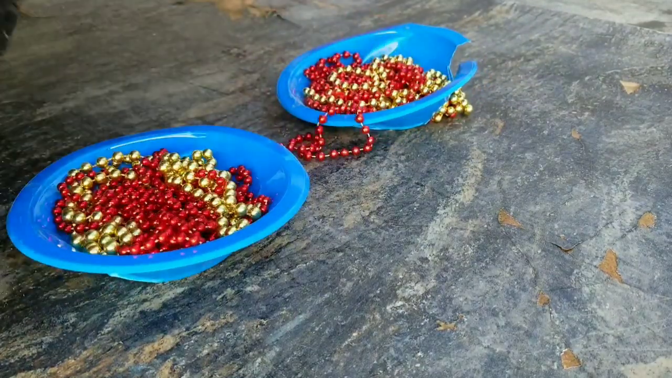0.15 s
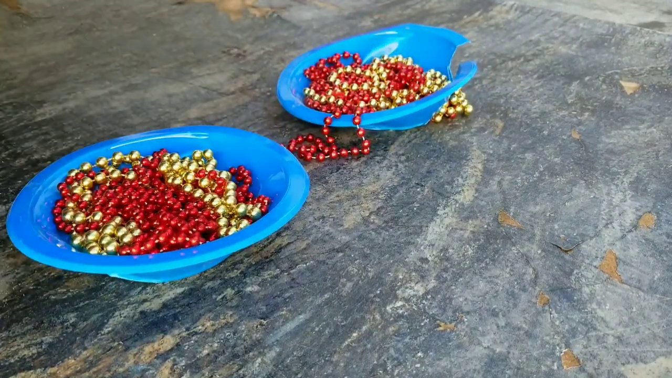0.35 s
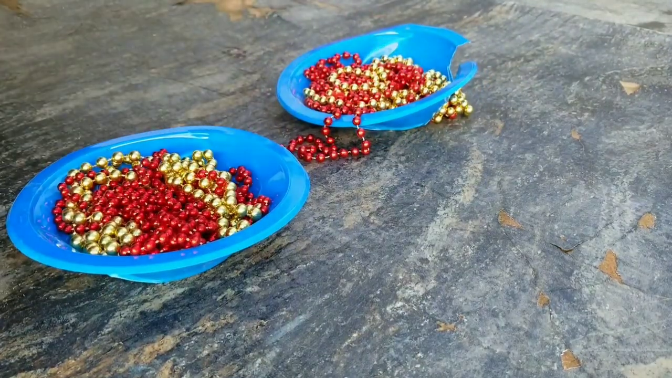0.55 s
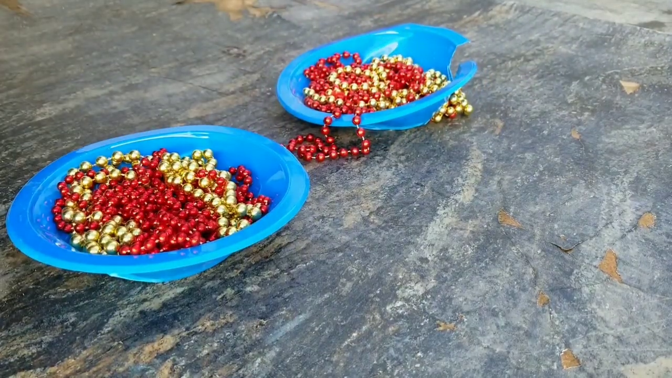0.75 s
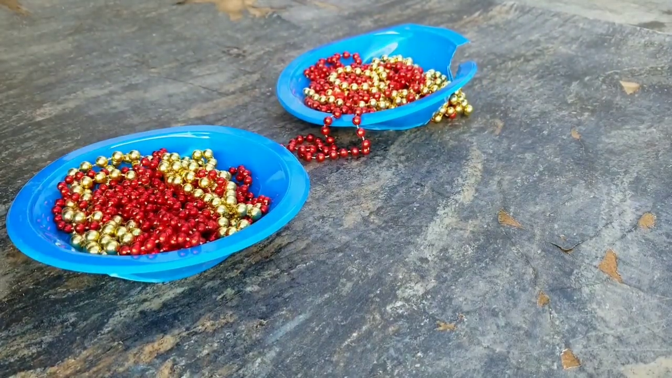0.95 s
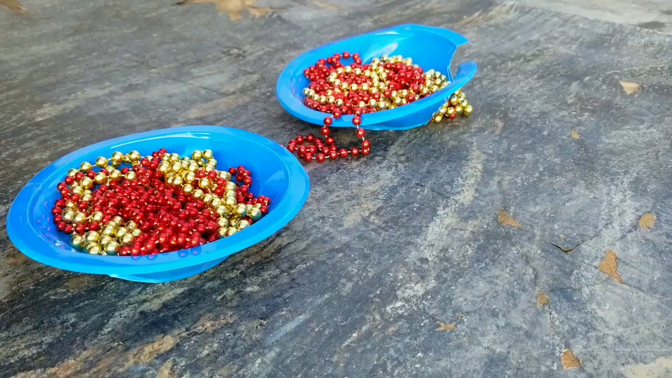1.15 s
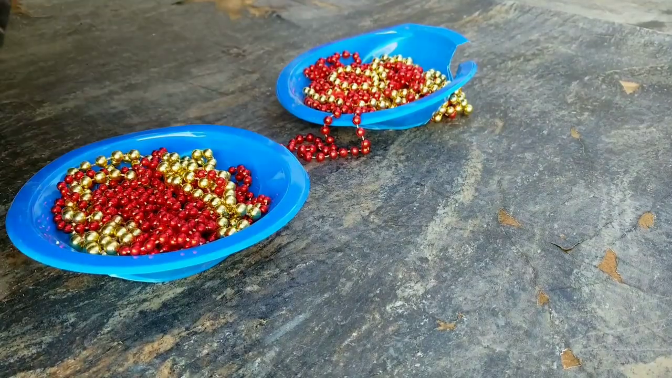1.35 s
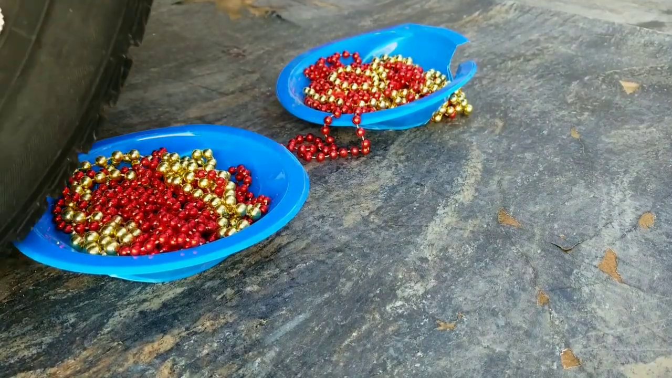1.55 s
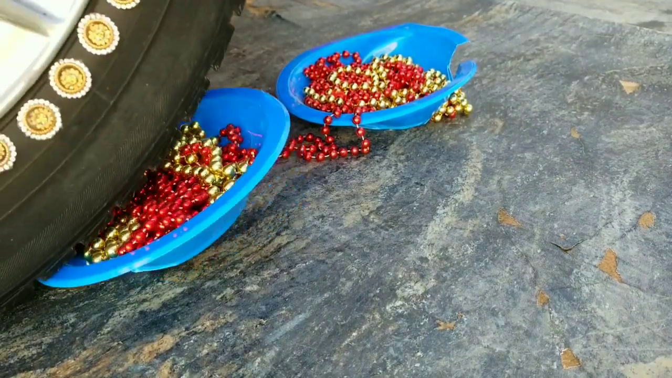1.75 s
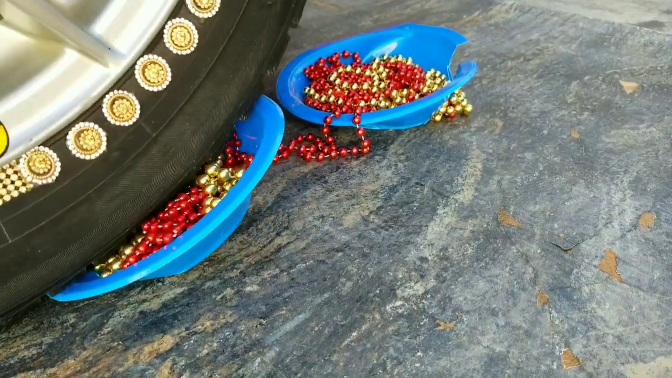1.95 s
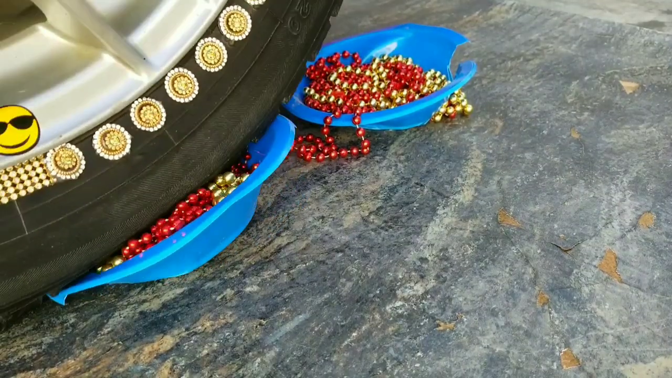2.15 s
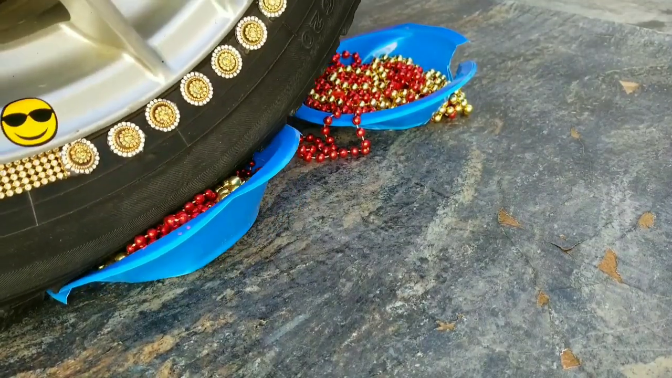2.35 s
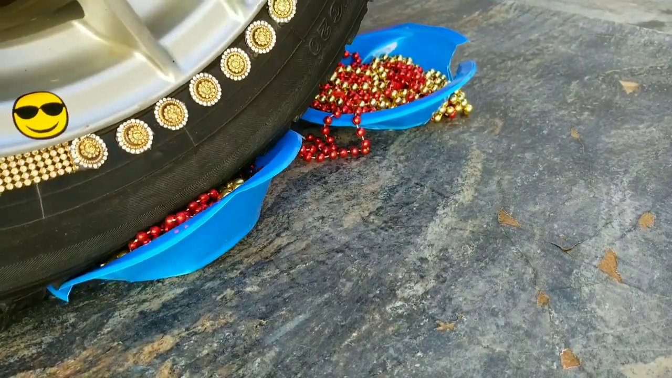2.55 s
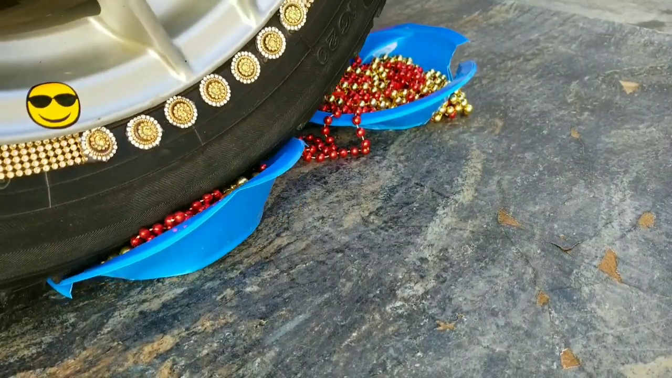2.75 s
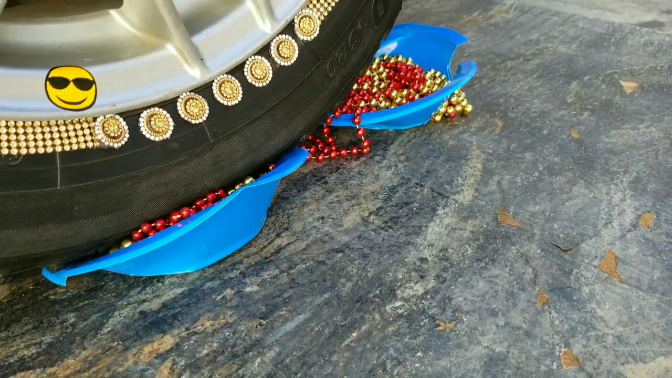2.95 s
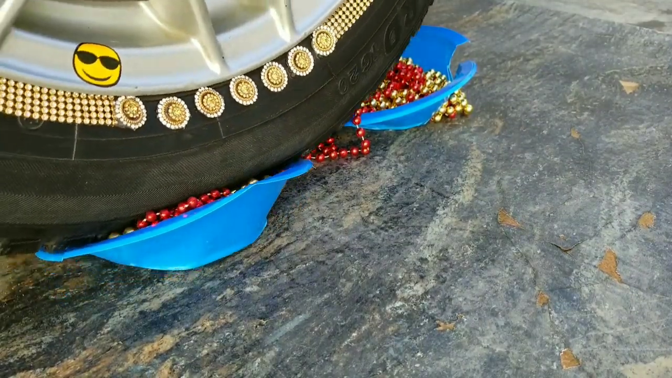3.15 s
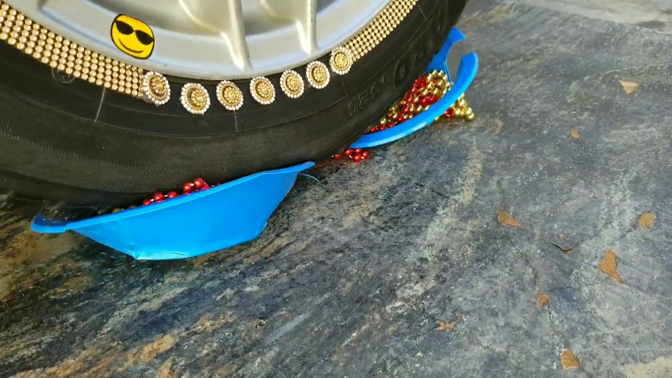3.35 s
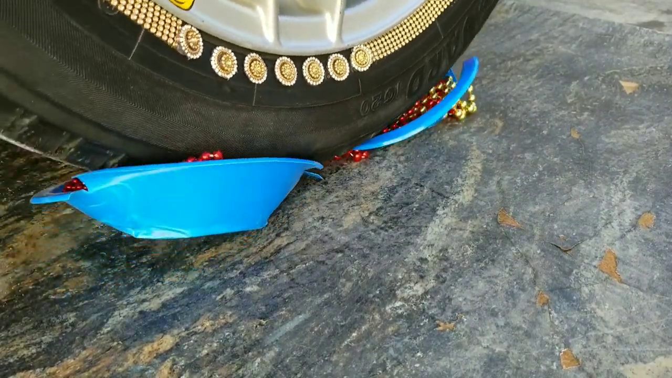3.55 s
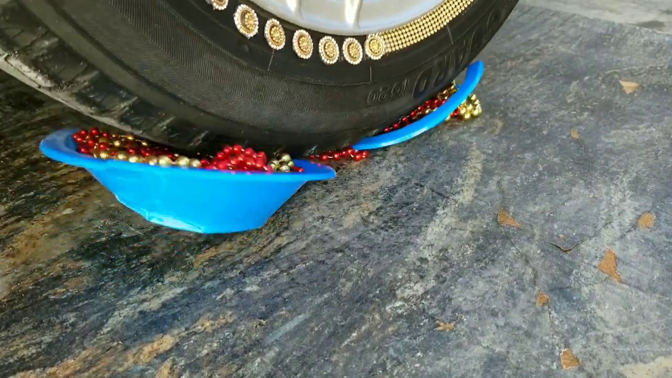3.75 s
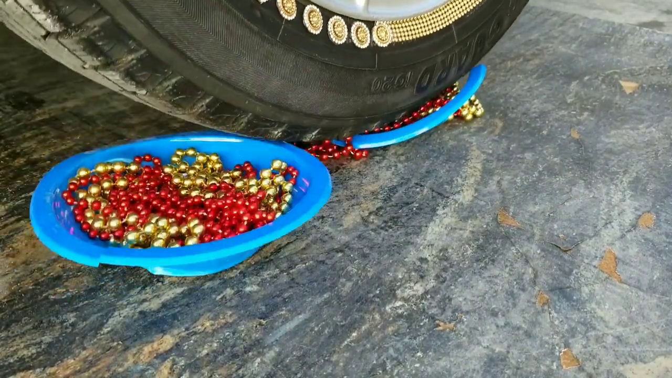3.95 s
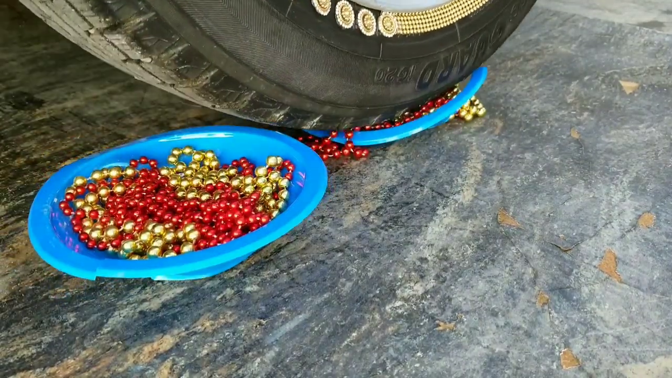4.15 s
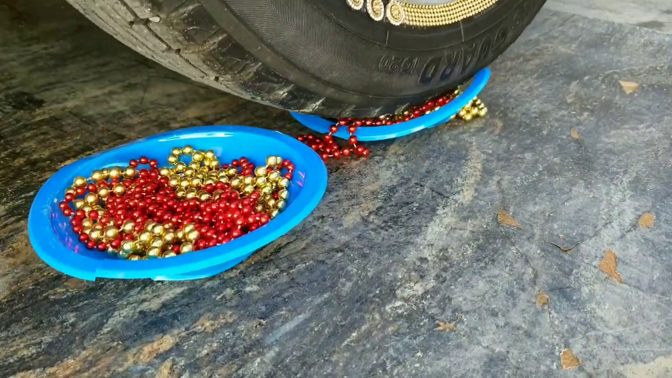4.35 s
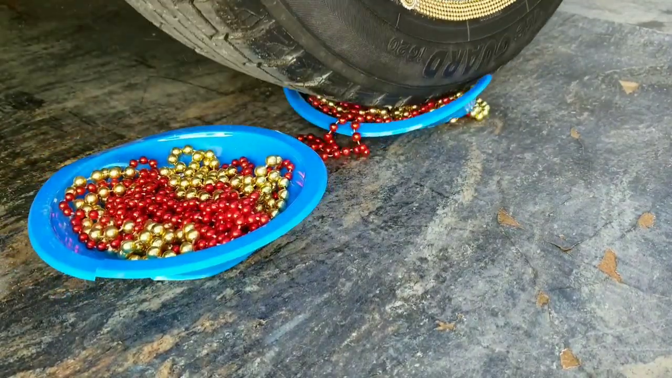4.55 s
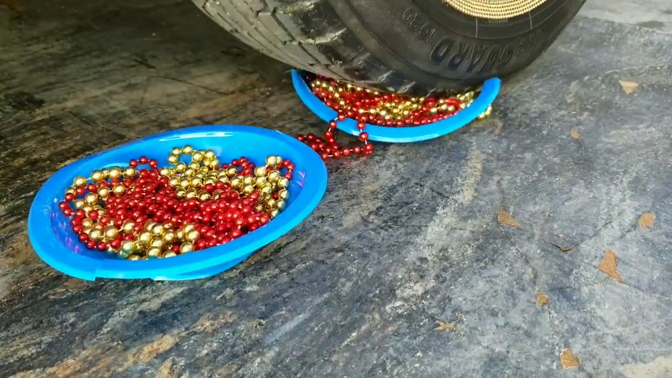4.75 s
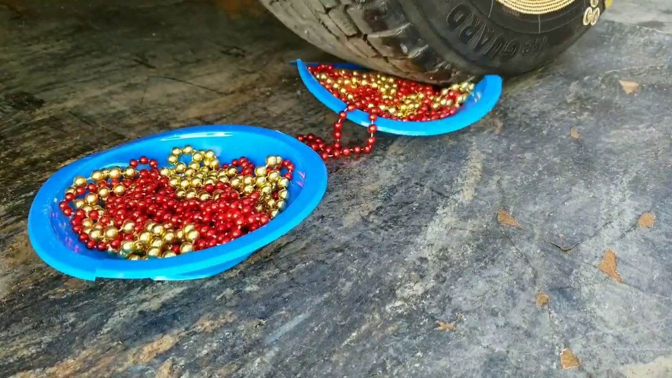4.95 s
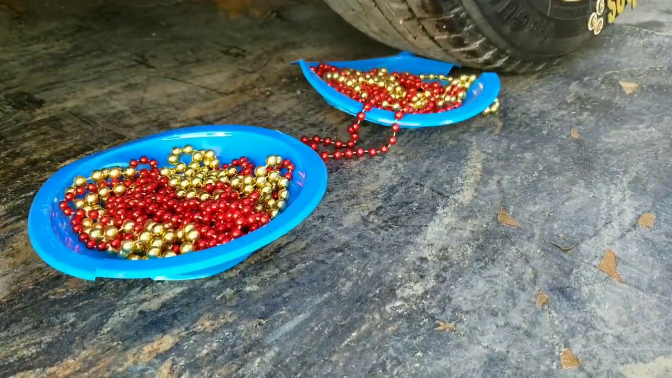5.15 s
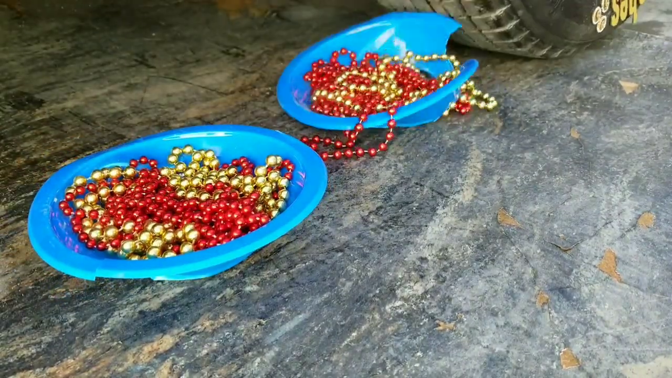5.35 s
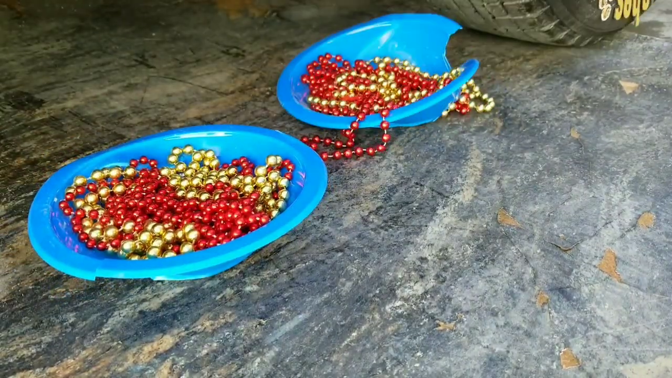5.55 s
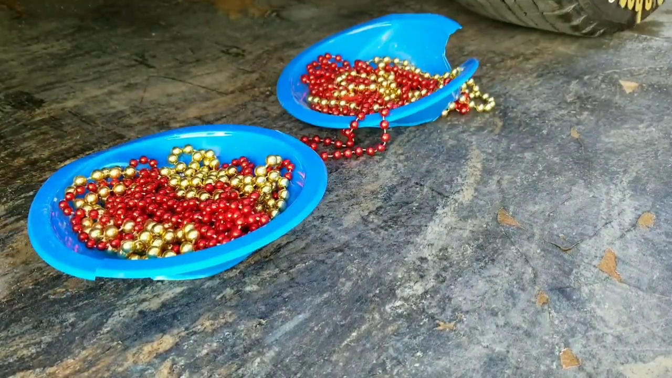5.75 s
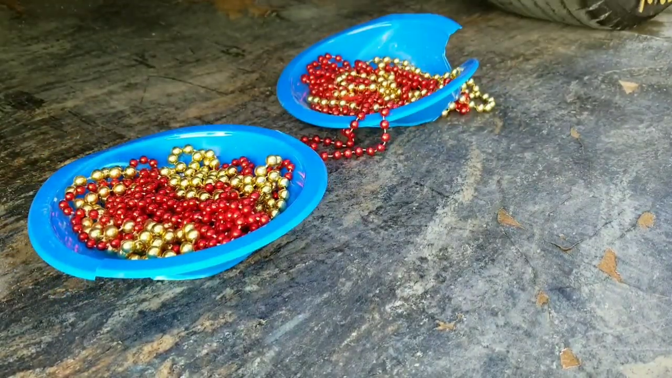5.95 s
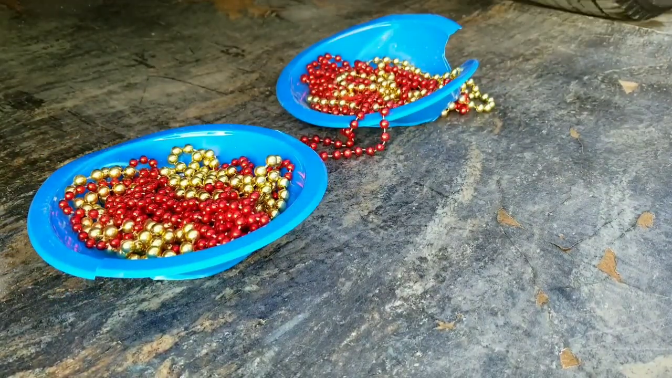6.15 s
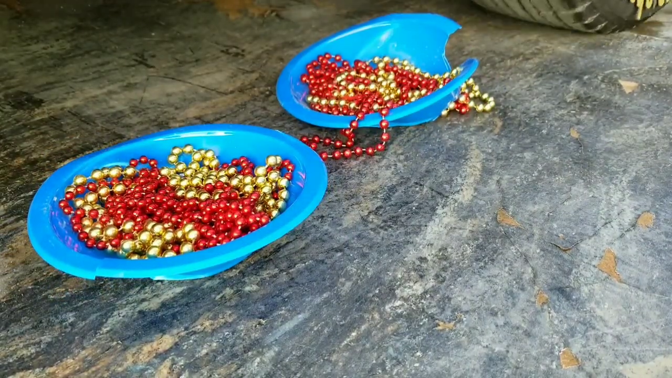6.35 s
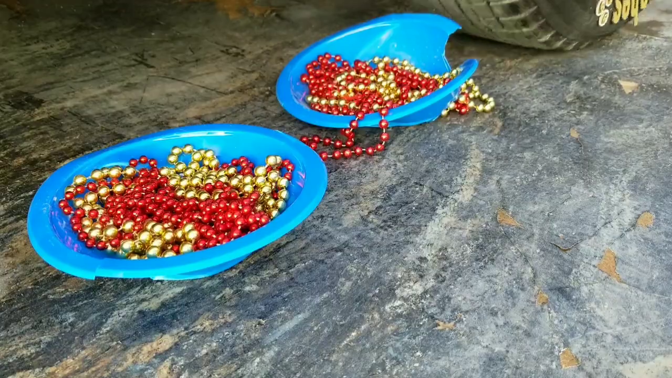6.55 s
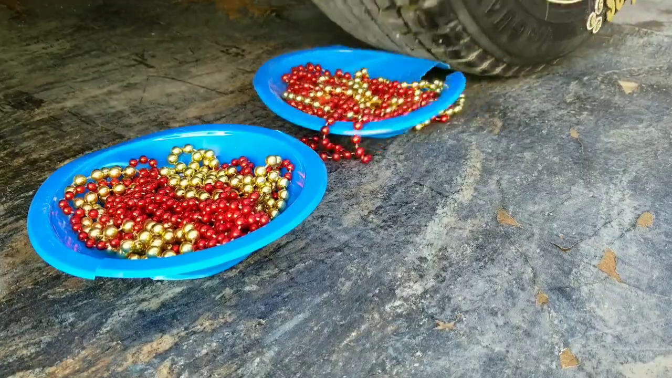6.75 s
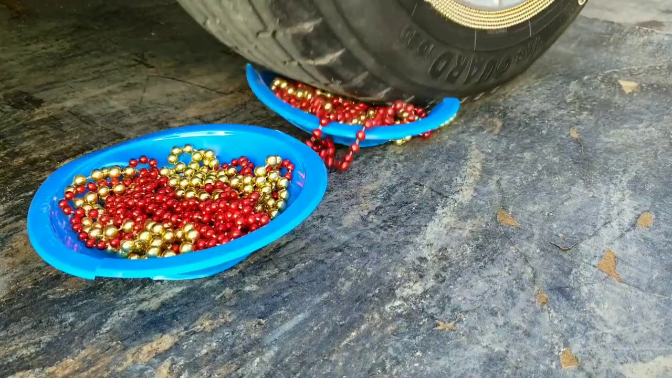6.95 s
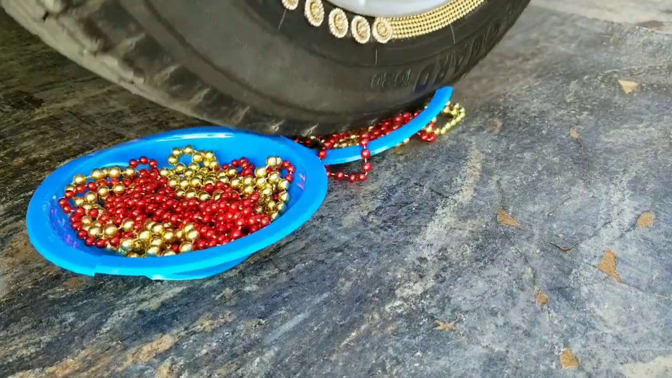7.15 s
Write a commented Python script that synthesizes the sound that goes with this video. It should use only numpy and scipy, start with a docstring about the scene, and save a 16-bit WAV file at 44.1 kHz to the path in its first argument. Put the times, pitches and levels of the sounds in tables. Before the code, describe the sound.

Close stereo pickup on a hard floor with short, diffuse echo. Beads clatter down and settle into near quiet. A tyre creeps up with a faint low groan; beads slide and crunch, then the near bowl, slightly left, snaps and pops in a dense burst. Cracks thin out, then return as the tyre moves to the farther, more central bowl. A quiet lull with bead ticks follows, then creaks and renewed cracking.

```python
"""Sharp plastic cracks, each a bright snap and a hollow pop, over beads that slide, crunch and tick.
A car tyre creeps over two thin bowls of bead necklaces on a hard floor, backs off and comes again.
Cracks are noise bursts over decaying shell tones; beads are coloured noise broken into tiny contacts.
The tyre is a soft noise rumble whose air rings with one low note; a diffuse noise tail is the short echo.
Shrill creaks, faint squeaks and groans, two faint tones, low and very high, and smooth hiss fill in the rest."""
import sys
import numpy as np
from scipy import signal
from scipy.fft import rfft, irfft, next_fast_len
from scipy.io import wavfile
from scipy.ndimage import uniform_filter1d, map_coordinates

SR = 44100
rng = np.random.default_rng(int(sys.argv[2]) if len(sys.argv) > 2 else 0)


def wav_out(sig):
    """Save sig, one row per channel (or a flat mono array), as 16-bit PCM at SR to the path in sys.argv[1]."""
    wavfile.write(sys.argv[1], SR, np.round(np.clip(np.atleast_2d(sig).T, -1, 1) * 32767).astype(np.int16))


N = 321477

# All dB levels in the tables are relative; the layers trim them further.
# Cracks of the plastic. Each row: time in seconds, snap level in dB, pop level in dB, pop pitch in Hz.
CRACK_EVENTS = [(1.9038, -23.5, -39.5, 1130), (1.925, -18, -28, 1280), (1.9554, -17.5, -31.5, 1230),
                (1.966, -17.5, -46, 1243), (1.9845, -20, -36.5, 1080), (1.9985, -17.5, -25, 1000),
                (2.0083, -23.5, -33.5, 600), (2.0252, -16, -26, 970), (2.0371, -15.5, -26, 915),
                (2.053, -25.5, -21, 826), (2.068, -14.5, -23, 820), (2.0918, -29.5, -31, 900),
                (2.139, -23.5, -36.5, 724), (2.1456, -14, -13.5, 810), (2.1497, -18.5, -18, 850),
                (2.1631, -17, -15.5, 768), (2.1871, -24, -35.5, 790), (2.2069, -10.5, -26.5, 1280),
                (2.2454, -19.5, -13, 836), (2.281, -30.5, -36, 725), (2.3367, -28, -36, 930),
                (2.3559, -24, -33, 880), (2.369, -39, -45.5, 906), (2.388, -26, -27.5, 860),
                (2.44, -16, -17, 792), (2.573, -29, -33.5, 890), (2.6056, -36, -44.5, 962),
                (2.618, -28, -32, 765), (2.634, -30, -34.5, 820), (2.6798, -35, -32.5, 850),
                (2.756, -18, -8.5, 780), (2.784, -16.5, -34, 794), (2.8536, -26, -36.5, 730),
                (2.9035, -27, -30, 700), (2.9552, -29.5, -36.5, 950), (2.9827, -30, -34.5, 1020),
                (3.041, -25, -24.5, 766), (3.0592, -35.5, -30, 740), (3.11, -39, -54.5, 910),
                (3.1286, -39.5, -44.5, 900), (3.1355, -29.5, -31, 805), (3.163, -33, -33.5, 1018),
                (3.1876, -19, -15, 870), (3.2544, -35.5, -50.5, 810), (3.275, -32.5, -36, 1000),
                (3.3189, -21.5, -18, 784), (3.331, -29, -34.5, 825), (3.3852, -20.5, -10, 733),
                (3.402, -24, -42, 857), (3.417, -34, -29, 870), (3.4469, -26.5, -40, 900),
                (3.4688, -28, -30.5, 850), (3.479, -25.5, -32.5, 1090), (3.5165, -16, -21.5, 810),
                (3.5404, -17, -24, 910), (3.5495, -29, -25.5, 865), (3.5786, -21, -26.5, 780),
                (3.6262, -14, -16.5, 770), (3.639, -28, -34.5, 860), (3.6822, -29, -39, 850),
                (3.7247, -21, -36, 1220), (3.758, -33.5, -57, 1370), (3.7915, -36.5, -60, 860),
                (3.847, -23.5, -17.5, 1350), (4.1025, -23.5, -18, 800), (4.1974, -30.5, -30, 960),
                (4.212, -32, -40.5, 885), (4.3583, -33.5, -36.5, 1224), (4.38, -19.5, -24, 970),
                (4.4757, -29.5, -31, 930), (4.5043, -11, -14.5, 990), (4.551, -18.5, -23.5, 980),
                (4.5535, -30.5, -17, 950), (4.6301, -26.5, -26, 920), (4.6688, -29, -31.5, 1290),
                (4.6811, -21.5, -13, 875), (4.725, -22, -12, 887), (4.743, -15.5, -36, 980),
                (4.7669, -20, -18, 900), (4.8161, -27.5, -45, 1150), (4.8282, -24.5, -20, 820),
                (4.8414, -21.5, -22.5, 870), (4.9085, -22, -24.5, 1010), (4.924, -32.5, -28.5, 880),
                (4.9646, -35.5, -30.5, 810), (4.9832, -23, -61.5, 1275), (6.9857, -23.5, -24, 1040),
                (7.0228, -23.5, -22, 940), (7.0305, -28, -23, 860), (7.0401, -33, -26.5, 850),
                (7.0538, -27.5, -26.5, 670), (7.0683, -22, -21, 860), (7.081, -24, -26, 860),
                (7.0894, -26, -29, 770), (7.1141, -31, -23.5, 815), (7.1195, -22.5, -25, 790),
                (7.1314, -22.5, -26, 980), (7.1544, -32.5, -31, 780), (7.183, -29, -28, 800),
                (7.2081, -21.5, -24, 930), (7.224, -30.5, -32, 1030), (7.247, -27, -29, 710),
                (7.2646, -24.5, -24, 800)]
# Modes of a buckling wall. Each row: multiple of the pop pitch, level in dB, T60 in seconds.
SHELL_MODES = [(.72, -8, 0.0072), (1, 9.5, 0.01), (1.4, -13.5, .01)]
# Low modes of the bowl's base. Each row: frequency in Hz, level in dB.
BASE_MODES = [(255, -27.5), (362, -23), (478, -28)]
# Resonances of the bowl wall. Each row: frequency in Hz, width in Hz, level in dB.
WALL_MODES = [(520, 1300, -10.5), (727, 170, -1), (841, 50, 2), (1046, 100, -1.5)]
# Colour of the snaps. Each row: frequency in Hz, density in dB per Hz.
SNAP_SPECTRUM = [(1000, -37), (2800, -2.5), (4200, 3), (6000, 1), (7300, -2), (8500, -8), (11200, -1),
                 (13000, -3.5), (15500, -11)]
# Colour of the clacks. Each row: frequency in Hz, density in dB per Hz.
CLACK_SPECTRUM = [(120, -39), (250, 6.5), (500, 5), (900, -8), (1400, 6.5), (2500, 9), (3600, -6),
                  (5000, -29), (9000, -44)]
# Shoves that set a heap of beads sliding. Each row: start in seconds, attack in seconds, hold in seconds,
# slide level in dB, crackle over slide in dB, wall over slide in dB.
SHOVE_EVENTS = [(0, 0.0024, 0.024, -28.5, -9, -19), (0.042, 0.034, .012, -31, -8.5, -8),
                (0.321, 0.021, 0.69, -70.5, -3, -26), (1.077, 0.033, 0.042, -69.5, 9, -5),
                (1.392, 0.11, 0.14, -54, -1.5, -7), (1.657, 0.025, 0.056, -40, -1.5, -11),
                (1.74, 0.017, 0.13, -50, -4, -4), (1.871, 0.066, 0.073, -19.5, -3, -15),
                (2.077, 0.017, 0.05, -36, -4, 4.5), (2.123, 0.02, 0.079, -20.5, -15.5, -19),
                (2.435, 0.011, 0.08, -43.5, -6.5, -3), (2.748, .02, 0.015, -41, -18.5, -11),
                (3.4, .015, 0.1, -33, -8, -9), (3.543, 0.067, 0.044, -28.5, 4.5, -1.5),
                (3.677, 0.0044, 0.083, -41, -4, -12), (3.859, 0.0074, 0.058, -44.5, -5.5, 0.5),
                (3.998, 0.014, 0.046, -49.5, -10, 3), (4.538, 0.013, 0.038, -34, -14, -4),
                (4.702, 0.017, 0.078, -34.5, -14, -20.5), (4.811, 0.005, 0.0086, -30.5, 5, 3),
                (4.905, 0.0085, 0.055, -37.5, -3.5, -18), (5.031, 0.089, 0.15, -51.5, -11.5, -8),
                (5.279, 0.0095, 0.031, -46.5, -6.5, -2), (5.311, 0.12, 0.056, -41.5, -12, -13.5),
                (5.533, 0.0052, 0.023, -47.5, -5, -1), (6.35, 0.02, .32, -66, 3, -18.5),
                (6.703, 0.013, 0.15, -34, -6, -12), (6.874, 0.083, 0.053, -25, 0, -10),
                (6.976, 0.043, 0.15, -26.5, 7, -2.5), (7.195, 0.009, 0.073, -30, -3.5, -20)]
# Creeping of the pinned beads between shoves. One row: slide in dB, crackle in dB, wall in dB.
CREEP_LEVELS = (-59, -65.5, -58.5)
# Load that pins the beads. Each row: time in seconds, share of the car's weight from 0 to 1.
LOAD_CURVE = [(2.2, 0), (2.35, 1), (4.4, 1), (5.1, 0)]
# Colour of sliding beads. Each row: frequency in Hz, density in dB per Hz.
SLIDE_SPECTRUM = [(300, -43.5), (750, -9.5), (1300, -4.5), (1620, -1.5), (2000, -3.5), (3000, -2.5),
                  (4900, -7.5), (6500, -20.5), (9000, -32.5), (15000, -47)]
# Colour of crunching beads. Each row: frequency in Hz, density in dB per Hz.
CRACKLE_SPECTRUM = [(1500, -45.5), (3500, -8.5), (5200, 3), (7000, -0.5), (8500, -4), (11000, -1),
                    (13000, -3.5), (15500, -13)]
# Single knocks of beads. Each row: time in seconds, level in dB, brightness in dB.
BEAD_KNOCKS = [(0.0084, -11.5, -21), (0.0158, -14, -13), (0.09, -13, -23), (0.164, -23.5, -34),
               (0.216, -25.5, -24), (0.275, -36.5, -22), (0.474, -38.5, -26), (0.5472, -33.5, -7),
               (0.5875, -29.5, 7), (0.602, -33, 2), (1.478, -36.5, -17), (1.62, -35.5, -15.5),
               (2.5135, -23.5, 7), (3.9572, -30.5, -17), (5.412, -28, -10), (5.468, -29, -3),
               (5.543, -24, -21), (5.57, -26.5, -22), (5.757, -42.5, -3), (5.976, -43.5, -17.5),
               (6.471, -37.5, 2), (6.7133, -17.5, -2), (6.7259, -21, -20), (6.84, -14.5, -10)]
# Stick-slip creaks of the rim under the tread. Each row: time in seconds, level in dB.
RIM_CREAKS = [(6.9355, -15), (6.9405, -24), (6.951, -19), (6.962, -16), (6.9705, -19), (6.977, -16)]
# Ringing after the necklace drops in at the start. Each row: frequency in Hz, level in dB.
NECKLACE_RING = [(743, -58), (1028, -53), (2650, -59)]
# Rolling of the tyre. Each row: time in seconds, rumble and scuff level in dB.
ROLLING_CURVE = [(0.0, -92), (0.41, -90.5), (1.0, -73.5), (1.52, -62.5), (2.11, -49), (3.09, -74.5),
                 (3.55, -63), (4.2, -74), (4.73, -59), (4.97, -69.5), (5.3, -82), (5.72, -72.5),
                 (6.52, -62), (6.98, -60), (7.19, -51), (7.29, -51)]
# Colour of the rumble. Each row: frequency in Hz, density in dB per Hz.
RUMBLE_SPECTRUM = [(25, -10.5), (75, -3.5), (115, 0.5), (165, -10), (400, -45)]
# Colour of the tread scuffing the floor. Each row: frequency in Hz, density in dB per Hz.
TREAD_SPECTRUM = [(90, -25), (160, -4.5), (300, -9), (560, -11.5), (800, -23), (2500, -48.5)]
# The tread presses on a bowl. Each row: start in seconds, attack in seconds, hold in seconds, level in dB.
TREAD_PRESSES = [(1.418, 0.2, .1, -54.5), (1.932, 0.06, 0.024, -26), (2.103, 0.021, 0.099, -56),
                 (3.55, 0.15, 0.061, -56), (4.649, 0.064, 0.1, -55), (6.97, 0.065, 0.24, -46.5)]
# Colour of the pressing thuds. Each row: frequency in Hz, density in dB per Hz.
THUD_SPECTRUM = [(60, -36.5), (130, 5), (230, 2.5), (340, -1.5), (480, -9.5), (800, -27), (2000, -47.5)]
# Faint squeaks of rubbing parts. Each row: start in seconds, length in seconds, pitch in Hz,
# level in dB, random pitch waver in Hz.
RUBBING_SQUEALS = [(5.397, 0.21, 1687, -48.5, 130), (5.596, 0.576, 1978, -73.5, 42.06),
                   (6.53, 0.212, 1450, -68, 28)]
# Low groans of the tyre as it gets rolling. Each row: start in seconds, length in seconds, pitch in Hz,
# level in dB, random pitch waver in Hz.
TYRE_GROANS = [(1.42, .42, 137.5, -52.5, 29), (6.4, .55, 75.8, -56, 12.1)]
# Which bowl is sounding. Each row: time in seconds, blend from 0 (second bowl) to 1 (first bowl).
BOWL_BLEND = [(1.3, 0), (1.6, 1), (3.4, 1), (3.9, 0), (6.9, 0), (7.29, 1)]
# Decay of the room. Each row: frequency in Hz, T60 in seconds.
ROOM_DECAY = [(150, 0.92), (800, 0.4), (3000, 0.59), (8000, 0.51), (15000, 0.18)]
# Faint background tones, one low and one very high, that waver in level and phase. Each row: frequency in Hz,
# level in dB.
BACKGROUND_TONES = [(313, -69), (10013, -86)]
# Colour of the background hiss. Each row: frequency in Hz, density in dB per Hz.
HISS_SPECTRUM = [(100, -6.5), (560, -2.5), (900, -8.5), (1500, -15.5), (5000, -14), (8000, -18.5),
                 (12000, -18.5), (15500, -22.5)]

# The clack follows its snap: dB at the reference snap, growth in dB per dB, extra dB for the second bowl.
CLACK_DB, REFERENCE_SNAP_DB, CLACK_GROWS, FAR_CLACK_DB = -31, -23, 0.95, 6.5
# A snap starts almost at once; the second bowl's bursts are drawn out by this share.
SNAP_RISE_S, SNAP_T60_S, FAR_STRETCH = .00005, .0046, .35
# After a movement the sound drops quickly, then a quieter remainder settles.
STOP_T60_S, SETTLE_DB, SETTLE_T60_S = 0.15, -17.5, 0.8
# The air in the tyre, rung by the pops.
CAVITY_HZ, CAVITY_T60_S, FIRST_RING_DB = 234.7, 1.9, -57
TOP_HZ = 15900


def cracks(hollow_db, jumpy_db, snap_db, pop_db, snap_t60, clack_t60, rise, scatter_db, scatter_t60,
           far_db, far_stretch, base_t60, snap_scatter_db, dull_db, dull_hz):
    """A wall gives way: a snap, a clack and a few cycles of the buckling shell, then scatter off floor and car."""
    out = np.zeros((2, N))
    lead = .004
    t = np.arange(SR // 6) / SR - lead
    age = np.maximum(t, 0)
    # every fracture frees a different piece of plastic, with resonances of its own
    snaps = noise(SNAP_SPECTRUM, alike=.3, patchy_db=3.8)
    clacks = noise(CLACK_SPECTRUM, alike=.65, patchy_db=3)
    # a fracture runs in tiny jumps
    jumps = unit(amp(jumpy_db * wobble(2500)))[None]
    # the tyre shades the top of the second bowl's snaps
    shaded = filtered(snaps, lambda hz: amp(dull_db / (1 + (dull_hz / (hz + 1)) ** 10)))
    hollow = unit(wall(pair(alike=0.67)))
    # the base of the bowl answers lower and longer than its wall
    base = sum(np.sin(2 * np.pi * hz * age) * amp(db - 60 * age / base_t60) for hz, db in BASE_MODES)
    opening = (t > -.001) & (t < .004)

    def piece(source):
        """A random excerpt, one crack long."""
        return source[:, rng.integers(N - len(t)):][:, :len(t)]

    def burst(t60):
        """A steep onset and an exponential fade."""
        onset = 1 / (1 + amp(np.clip(-t / rise, -200, 200)))
        return amp(-60 * age / t60) * onset

    def sized(x):
        """Scale to rms 1 over the 5 ms around the onset."""
        return x / np.sqrt(np.mean(x[:, opening] ** 2))

    def struck(source, t60, tail):
        """Noise shaped by a jumpy burst and its scattered tail."""
        return sized(piece(source) * (piece(jumps) * burst(t60) + tail))

    for s, snap, pop, pop_hz in CRACK_EVENTS:
        far = np.clip((s - 3.5) / .4, 0, 1)
        stretch = 1 + far * far_stretch
        clack = CLACK_DB + CLACK_GROWS * (snap - REFERENCE_SNAP_DB) + far * FAR_CLACK_DB
        # the second bowl lies farther off, so more of its sound arrives scattered
        scatter = amp(scatter_db + far * far_db - 60 * age / scatter_t60) * (1 - np.exp(-age / 0.00021))
        swing = 0
        for ratio, db, t60 in SHELL_MODES:
            # the side modes shift with the shape of each dent
            mode_hz = pop_hz * ratio ** rng.uniform(.75, 1.15)
            fade = amp(db + rng.normal(0, 2.5) - 60 * age / t60)
            swing = swing + np.sin(2 * np.pi * mode_hz * age) * fade
        tones = (swing + base) * (1 - np.exp(-age / 0.00055))
        shell = sized(amp(hollow_db) * scatter * piece(hollow) - tones)
        snap_source = shaded if far > .5 else snaps
        sound = amp(snap + snap_db) * struck(snap_source, snap_t60 * stretch, amp(snap_scatter_db) * scatter)
        sound += amp(clack) * struck(clacks, clack_t60 * stretch, scatter)
        add(out, s - lead, sound + amp(pop + pop_db) * shell)
    return out


def wall(x):
    """The damped resonances of a bowl, in alternating polarity."""
    def response(f):
        total = 0
        for k, (centre, width, db) in enumerate(WALL_MODES):
            damping = 1j * f * width
            total = total + (-1) ** k * amp(db) * damping / (centre * centre - f * f + damping)
        return total

    return filtered(x, response)


def crush(splinter_db, splinter_knock_db, wall_db, slide_db, crackle_db, coarse_from_db, coarse_share):
    """Beads grind under the tread; the same contacts crackle, rattle and knock the bowl."""
    load = np.clip(curves(LOAD_CURVE)[0], 0, 1)
    power = np.outer(amp(CREEP_LEVELS) ** 2, load)
    for s, attack, hold, db, over_crackle, over_wall in SHOVE_EVENTS:
        levels = amp([db, db + over_crackle, db + over_wall])
        power += np.outer(levels ** 2, stroke(s, attack, hold) ** 2)
    slide_gain, crackle_gain, wall_gain = np.sqrt(power)
    # loose beads slide in a dense rustle; pinned under the full load they slip one by one
    loose = contacts(rate=800, spread_db=3.3, life=.0006, bed=.2)
    coarse = contacts(rate=420, spread_db=4.8, life=.0005, bed=.07)
    # a hard crunch turns coarse as well
    hard = np.clip(crackle_gain / amp(coarse_from_db), 0, 1) * np.clip(coarse_share, 0, 1)
    pinned = np.maximum(load, hard)
    grain = pinned * coarse + (1 - pinned) * loose
    # small splinters snap off between the big cracks and knock the wall too
    splinters = contacts(rate=110, spread_db=1.7, life=.0005, bed=0)
    snaps = unit(noise(SNAP_SPECTRUM, alike=.4, patchy_db=4) * splinters)
    knocks = unit(wall(pair(alike=.9) * (grain + amp(splinter_knock_db) * splinters)))
    # the pile keeps shifting, and its resonances with it
    slide = unit(noise(SLIDE_SPECTRUM, alike=.35, patchy_db=3) * grain)
    crackle = unit(noise(CRACKLE_SPECTRUM, alike=.3, patchy_db=3) * grain)
    crunch = crackle_gain * (amp(crackle_db) * crackle + amp(splinter_db) * snaps)
    return amp(wall_db) * wall_gain * knocks + amp(slide_db) * slide_gain * slide + crunch


def beads(level_db, bright_db, bright_t60, click_t60, tail_db, tail_t60):
    """A bead drops on its neighbours or on the bowl: a dry click, dull or bright."""
    out = np.zeros((2, N))
    t = np.arange(SR // 12) / SR
    dull_fade = amp(-60 * t / click_t60) + amp(tail_db - 60 * t / tail_t60)
    bright_fade = amp(-60 * t / bright_t60)
    dull = noise(SLIDE_SPECTRUM, alike=.3, patchy_db=3.5)
    # (Hz, dB per Hz)
    bright = noise([(2500, -41.5), (4900, -1.5), (7000, -15.5), (15000, -18.5)], alike=0.17)
    for s, db, brightness in BEAD_KNOCKS:
        start = rng.integers(N - len(t))
        excerpt = slice(start, start + len(t))
        tick = amp(brightness + bright_db)
        click = dull[:, excerpt] * dull_fade + 2 * tick * bright[:, excerpt] * bright_fade
        add(out, s, amp(db + level_db) * click / np.hypot(1, tick))
    return out


def creaks(centre_hz, width_hz, t60):
    """Each slip of the rim excites one shrill resonance for a moment."""
    out = np.zeros((2, N))
    t = np.arange(SR // 20) / SR
    for s, db in RIM_CREAKS:
        source = pair(alike=0.54, size=len(t))
        shrill = filtered(source, lambda hz: 1 / (1 + ((hz - centre_hz) / width_hz) ** 2))
        add(out, s, unit(shrill) * amp(db - 60 * t / t60))
    return out


def after_ring(t60):
    """A few thin tones linger after the necklace lands, each drifting in phase."""
    t = np.arange(N) / SR
    out = 0
    for hz, db in NECKLACE_RING:
        phase = 2 * np.pi * hz * t + wobble(22) + 2 * rng.random((2, 1))
        out = out + amp(db - 60 * t / t60) * np.sin(phase)
    return out


def tyre(rumble_db, tread_db, lumpy_db, thud_db, note_db, unloaded_db, ring_t60):
    """The tread rumbles, scuffs and thuds on the bowls, and every pop rings the air inside."""
    rolling = curves(ROLLING_CURVE)[0]
    rumble = amp(rolling + rumble_db + lumpy_db * wobble(18)) * noise(RUMBLE_SPECTRUM, alike=1.0)
    scuff_level = amp(rolling + tread_db + lumpy_db * wobble(38))
    scuff = scuff_level * noise(TREAD_SPECTRUM, alike=0.83, patchy_db=2)
    pressing = sum(amp(db) * stroke(s, attack, hold) for s, attack, hold, db in TREAD_PRESSES)
    thud_level = pressing * amp(thud_db + 0.86 * wobble(66))
    thuds = thud_level * noise(THUD_SPECTRUM, alike=0.77, patchy_db=-1)
    kicks = np.zeros(N)
    for s, _, pop, _ in CRACK_EVENTS:
        kicks[round(s * SR)] += amp(pop) ** 2
    # the energies of the pops add up and leak away
    ringing = np.sqrt(signal.lfilter([1], [1, -amp(-60 / (CAVITY_T60_S * SR)) ** 2], kicks))
    phase = 2 * np.pi * np.cumsum(CAVITY_HZ + 2 * wobble(12)) / SR
    # the note carries best while the tyre bears down on a bowl
    unloaded = 1 - curves(LOAD_CURVE)[0]
    note = ringing * amp(note_db + unloaded_db * unloaded + wobble(3.5)) * np.sin(phase)
    # it is still dying away from an earlier knock at the start
    note += amp(FIRST_RING_DB - 60 * np.arange(N) / SR / ring_t60) * np.sin(phase)
    return rumble + scuff + thuds + note


def rubbing(rows, apart):
    """Wavering tones of rubbing parts; each ear's phase is offset at random by up to apart radians."""
    out = np.zeros((2, N))
    for s, length, hz, db, waver in rows:
        n = int(length * SR)
        phase = 2 * np.pi * np.cumsum(hz + waver * wobble(300)[:n]) / SR
        level = amp(db + 3.2 * wobble(45)[:n]) * signal.windows.tukey(n, .5)
        add(out, s, level * np.sin(phase + apart * rng.random((2, 1))))
    return out


def placed(x, near_db, far_db, lead):
    """The first bowl lies to the left (lead in samples), the second almost ahead."""
    near = curves(BOWL_BLEND)[0]
    side = np.array([[.5], [-.5]])
    early = filtered(x, lambda hz: np.exp(2j * np.pi * hz * side * lead / SR))
    return near * early * amp(side * near_db) + (1 - near) * x * amp(side * far_db)


def room(x):
    """Nearby walls return a short diffuse tail, different at each ear."""
    hz, t, z = signal.stft(rng.standard_normal((2, SR // 2)), SR, nperseg=256)
    decay = amp(-60 * t / along(ROOM_DECAY, hz)[:, None])
    tail = signal.istft(z * decay, SR, nperseg=256)[1]
    # the tail arrives 10 ms late
    tail = np.pad(tail / np.linalg.norm(tail[0]), ((0, 0), (SR // 100, 0)))
    return signal.fftconvolve(x.mean(0)[None], tail, axes=1)[:, :N]


def background(hiss_db):
    """Two faint tones, low and very high, wavering in level and phase, over smooth hiss."""
    t = np.arange(N) / SR
    tones = 0
    for hz, db in BACKGROUND_TONES:
        tones = tones + amp(db + 2 * wobble(10)) * np.sin(2 * np.pi * hz * t + 1.4 * wobble(25))
    return tones + amp(hiss_db) * noise(HISS_SPECTRUM, alike=0.13)


def stroke(s, attack, hold):
    """Envelope of one movement: it rises, holds, stops and settles."""
    age = np.arange(N) / SR - s
    after = np.maximum(age - attack - hold, 0)
    settle = min(amp(SETTLE_DB), 1)
    release = (1 - settle) * amp(-60 * after / STOP_T60_S) + settle * amp(-60 * after / SETTLE_T60_S)
    return np.clip(age / attack, 0, 1) * release


def contacts(rate, spread_db, life, bed):
    """Envelope of many tiny contacts of uneven size (rate a second, life in s) over a bed of rubbing."""
    size = amp(spread_db * np.minimum(rng.exponential(size=N), 3))
    blows = (rng.random(N) < rate / SR) * size ** 2
    power = signal.lfilter([1], [1, -np.exp(-1 / (life * SR))], blows)
    return np.sqrt(power / power.mean() + abs(bed))


def noise(spectrum, alike, patchy_db=0):
    """Coloured stereo noise of rms 1, with resonant patches that come and go."""
    z = signal.stft(pair(alike), nperseg=512)[2]
    field = uniform_filter1d(rng.standard_normal(z.shape[1:]), size=5, axis=0)
    field = uniform_filter1d(field, size=7, axis=1)
    patchy = signal.istft(z * amp(patchy_db * unit(field)), nperseg=512)[1][:, :N]
    return unit(filtered(patchy, lambda hz: amp(along(spectrum, hz))))


def pair(alike, size=N):
    """Left and right white noise that share a part."""
    a, b = rng.standard_normal((2, size))
    turn = np.arccos(np.clip(alike, 0, 1)) / 2
    return np.cos(turn) * a + np.sin(turn) * np.array([b, -b])


def wobble(rate):
    """A smooth random curve, rate knots a second."""
    knots = rng.standard_normal(int(N * rate / SR) + 4)
    return map_coordinates(knots, [np.arange(N) * rate / SR])


def filtered(x, response):
    """Filter x by a complex response of frequency."""
    n = x.shape[-1]
    m = next_fast_len(n + 4096)
    return irfft(rfft(x, m) * response(np.fft.rfftfreq(m, 1 / SR)), m)[..., :n]


def curves(rows):
    """One value per sample for each column after the time."""
    s, *cols = np.transpose(rows)
    return [np.interp(np.arange(N) / SR, s, c) for c in cols]


def along(points, hz):
    """(Hz, value) points read on a log frequency axis."""
    f, v = np.transpose(points)
    return np.interp(np.log(hz + 1), np.log(f), v)


def add(track, s, sound):
    """Mix a sound into a track at time s."""
    start = max(round(s * SR), 0)
    part = track[:, start:start + sound.shape[-1]]
    part += sound[:, :part.shape[-1]]


def amp(db):
    """Decibels to gain."""
    return 10 ** (np.asarray(db) / 20)


def unit(x):
    """Scale to rms 1."""
    return x / np.sqrt(np.mean(x ** 2) + 1e-20)


def scene():
    """Bowls and beads in their room, with the car and the background."""
    bowls = cracks(hollow_db=-2.0, jumpy_db=5.5, snap_db=2.5, pop_db=0.5, snap_t60=SNAP_T60_S,
                   clack_t60=0.013, rise=SNAP_RISE_S, scatter_db=-11.5, scatter_t60=0.082, far_db=3.0,
                   far_stretch=FAR_STRETCH, base_t60=0.076, snap_scatter_db=-4, dull_db=-3.5, dull_hz=7000)
    bowls = bowls + beads(level_db=-10.5, bright_db=13.5, bright_t60=0.018, click_t60=0.029,
                          tail_db=-9.5, tail_t60=0.13)
    bowls = bowls + crush(splinter_db=-7.5, splinter_knock_db=1, wall_db=-3, slide_db=-0.5,
                          crackle_db=2.0, coarse_from_db=-21, coarse_share=1.0)
    bowls = bowls + creaks(centre_hz=3800, width_hz=530, t60=0.041) + after_ring(t60=1.1)
    # the bowls' sounds keep little bass below 140 Hz
    bowls = signal.sosfilt(signal.butter(N=4, Wn=140, btype="high", fs=SR, output="sos"), bowls)
    bowls = placed(bowls, near_db=0.76, far_db=-1.2, lead=5.06)
    car = tyre(rumble_db=2.0, tread_db=-1.5, lumpy_db=2.5, thud_db=1.0, note_db=-35.0,
               unloaded_db=-16.5, ring_t60=1.0)
    # the car sits slightly to the left: +1 dB left, -1 dB right
    car = car * amp([[1], [-1]])
    friction = rubbing(RUBBING_SQUEALS, apart=1) + rubbing(TYRE_GROANS, apart=.5)
    return bowls + amp(-20.0) * room(bowls) + car + friction + background(hiss_db=-65.0)


def record(dry):
    """The left port hears more treble; the loudest peaks saturate; the band ends steeply at TOP_HZ."""
    # (Hz, left over right in dB)
    tilt = [(8500, 1.4), (12500, 4.8)]
    x = filtered(dry, lambda hz: amp(np.array([[.5], [-.5]]) * along(tilt, hz)))
    x = x / (1 + np.abs(x) ** 6) ** (1 / 6)
    return filtered(x, lambda hz: 1 / (1 + (hz / TOP_HZ) ** 120))


dry = scene()
out = record(dry)
wav_out(out)
```